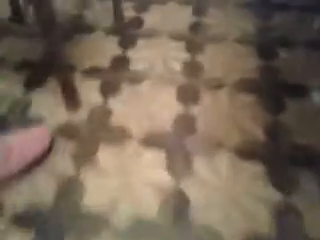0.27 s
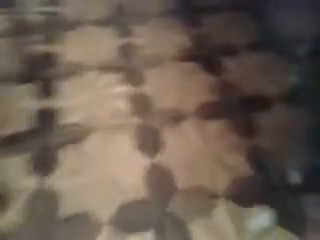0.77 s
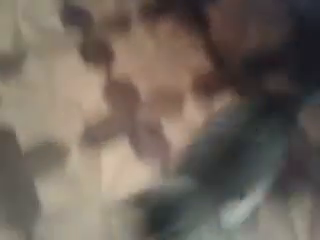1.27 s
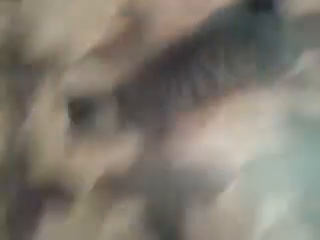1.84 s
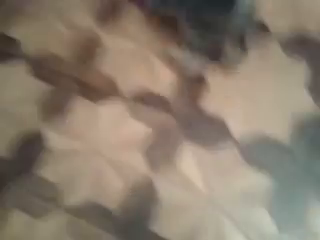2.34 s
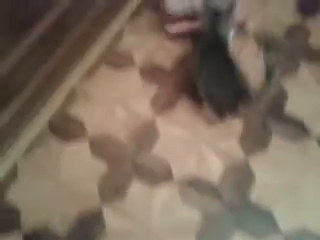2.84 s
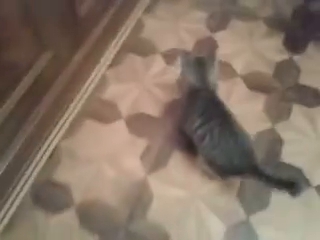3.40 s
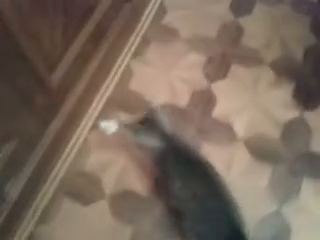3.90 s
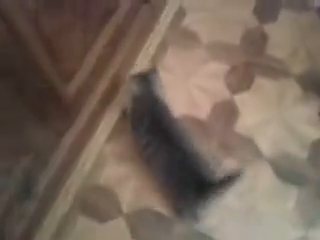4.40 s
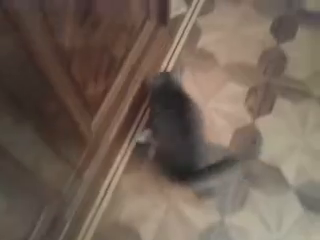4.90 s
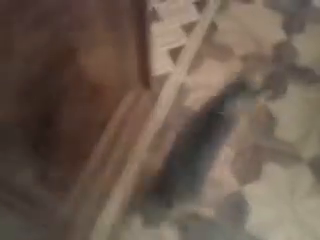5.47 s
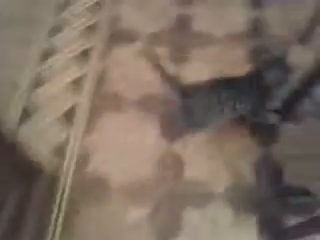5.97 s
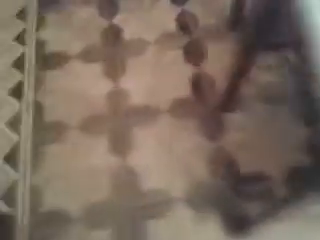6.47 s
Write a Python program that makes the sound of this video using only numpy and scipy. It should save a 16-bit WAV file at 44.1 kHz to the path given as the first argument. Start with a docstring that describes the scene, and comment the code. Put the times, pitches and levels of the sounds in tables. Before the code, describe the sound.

A kitten scuffles after a small ball on echoing tiles, paws pattering and claws clicking, with two hard knocks on a wooden door.

```python
"""In a bare, echoing room with a tiled floor, a kitten chases a small light ball.
Soft paws pat, claws and ball click on the tiles, and slides catch on the floor, scuffing and squeaking.
The kitten's weight makes dull thumps, and heavy blows set the room booming. Twice something knocks
hard on a wooden door, which rattles and rings. A small microphone with little bass and no high treble
picks it all up over a faint hiss."""
import sys
import numpy as np
from scipy import signal
from scipy.fft import rfft, irfft
from scipy.io import wavfile

SR = 44100
rng = np.random.default_rng(int(sys.argv[2]) if len(sys.argv) > 2 else 0)


def file_out(sig):
    """Save sig as 16-bit WAV at sys.argv[1]."""
    # one column per channel
    cols = np.atleast_2d(sig).T
    # limit, then scale
    lim = np.clip(cols, -1, 1)
    pcm = np.round(lim * 32767).astype(np.int16)
    wavfile.write(sys.argv[1], SR, pcm)


N = 297461

# The four pitches in Hz, low to high, at which taps, slides and knocks are given their tone.
BANDS_HZ = (400, 1000, 2300, 5500)


def from_db(db):
    """Turn decibels into a number to multiply by."""
    return 10 ** (np.asarray(db) / 20)


def unit(x):
    """Scale a sound to an energy of one."""
    return x / np.sqrt(np.sum(x ** 2) + 1e-20)


def at_hz(points, hz):
    """Read between rows of (Hz, value), with all octaves equally wide."""
    known_hz, values = np.transpose(points)
    return np.interp(np.log(np.maximum(hz, 1)), np.log(known_hz), values)


def add(out, s, sound):
    """Mix a sound in, starting at s seconds."""
    start = max(round(s * SR), 0)
    out[start:start + len(sound)] += sound[:max(N - start, 0)]


def colour(x, points, size=2048):
    """Shape the tone by rows of (Hz, dB), with a filter that never sounds ahead of its input."""
    gains = from_db(at_hz(points, np.fft.rfftfreq(size, 1 / SR)))
    cepstrum = irfft(np.log(gains))
    cepstrum[1:size // 2] *= 2
    cepstrum[size // 2 + 1:] = 0
    return signal.fftconvolve(x, irfft(np.exp(rfft(cepstrum))))


def tilted(shape_db, db, slope):
    """Levels for the four bands: harder contacts lean to the treble, by slope dB per octave."""
    return np.array(shape_db) + db + slope * np.log2(np.array(BANDS_HZ) / BANDS_HZ[2])


def ring(x, hz, t60):
    """Each click rings at one pitch; t60 is the ring time, the seconds it takes to fade by 60 dB."""
    fade, turn = np.exp(-np.log(1000) / (t60 * SR)), 2 * np.pi * hz / SR
    return signal.lfilter([0, np.sin(turn)], [1, -2 * fade * np.cos(turn), fade * fade], x + 1e-18)


def grains(per_s, spread_db):
    """Tiny contacts at random moments, of uneven size, pushing either way."""
    sizes = from_db(spread_db * np.minimum(rng.exponential(1, N), 4))
    signs = np.sign(rng.random(N) - .5)
    return sizes * signs * (rng.random(N) < per_s / SR)


def stroke(start, end, swell=0.21):
    """The samples a contact covers, and its pressure, which swells and lets go."""
    span = np.arange(max(round(start * SR), 0), min(round(max(end, start + .004) * SR), N))
    return span, np.sin(np.linspace(0, np.pi, len(span) + 2)[1:-1]) ** swell


def flatten(burst, evenness=0.2):
    """Spread a burst's energy a little more evenly from low to high pitch."""
    spectrum = rfft(burst, 2 * len(burst))
    evened = spectrum / (abs(spectrum) + 1e-9) ** evenness
    return unit(irfft(evened)[:len(burst)])


def contacts(rows, first_share, per_s, size=8192):
    """Each row (start, fade time, four band levels) sounds as a sharp touch and a dying chatter."""
    out, t = np.zeros(N), np.arange(size) / SR
    chatter = grains(per_s, spread_db=1.0)
    for s, fade_s, *levels in rows:
        dying = np.roll(chatter, -round(s * SR))[:size] * np.exp(-t / max(fade_s, .0005))
        burst = np.sqrt(1 - first_share) * unit(dying)
        # the first touch crackles for about a millisecond; a long, soft contact has less of it
        touch = unit(rng.standard_normal(size) * t * np.exp(-t / 0.00041))
        burst += np.sqrt(first_share) * np.exp(-abs(fade_s) / .012) * touch
        add(out, s, colour(flatten(burst), list(zip(BANDS_HZ, levels))))
    return out


def hiss():
    """Faint, steady noise lies under everything."""
    # The tone of the hiss. Each row: pitch in Hz, level in dB.
    hiss_tone = [(20, -36), (50, -54), (100, -72.5), (170, -58.5), (300, -49), (600, -47), (1200, -51),
                 (2500, -50.5), (4500, -53), (7000, -48.5)]
    return colour(rng.standard_normal(N + SR), hiss_tone, size=8192)[SR:SR + N]


def dash(grit, stop_s=0.021):
    """Running paws scuffle without a break, then come to a stop."""
    # The opening run. Each row: time in seconds, relative levels in dB of the middle and the treble.
    run_levels = [(0.0, -42.5, -44), (0.29, -48.5, -42), (0.42, -47.5, -53), (0.66, -47.5, -45),
                  (0.79, -46.5, -58), (0.92, -48, -62), (1.11, -47.5, -57), (1.25, -43.5, -47.5),
                  (1.38, -44, -52), (1.54, -46.5, -45.5), (1.69, -46.5, -54), (1.95, -43.5, -42.5),
                  (2.1, -44.5, -34.5), (2.19, -39, -41.5), (2.35, -47, -62), (2.46, -41, -39)]
    # The tones of those two parts. Each row: pitch in Hz, boost or cut in dB.
    middle_tone = [(400, 2), (1000, 0), (2300, 3), (5500, -5.5)]
    treble_tone = [(1000, -18.5), (2300, -1), (5500, 0.5)]
    s, middle_db, treble_db = np.transpose(run_levels)
    t = np.arange(N) / SR
    running = unit(grit) * np.sqrt(N) * np.clip((s[-1] - t) / stop_s, 0, 1)
    middle = colour(running * from_db(np.interp(t, s, middle_db)), middle_tone)
    treble = colour(running * from_db(np.interp(t, s, treble_db)), treble_tone)
    return (middle + treble)[:N]


def scuffs(ping_db=-6, ping_t60=0.011):
    """Running and sliding make tiny catches on the floor's grain; some set a claw or the ball pinging."""
    # Single slides. Each row: start and end in seconds, relative level in dB, tilt in dB per octave.
    skids = [(1.186, 1.278, -38, 2), (1.886, 1.946, -42, -0.5), (2.6, 2.629, -26.5, 3.5),
             (2.632, 2.782, -40, 3), (2.85, 3.02, -46, -1), (3.27, 3.396, -40.5, -1.5),
             (4.296, 4.38, -40.5, 9), (4.388, 4.525, -44.5, -2), (4.971, 5.11, -45.5, 7.5),
             (5.092, 5.166, -35.5, 7.5), (5.994, 6.004, -33.5, 0.5), (6.197, 6.465, -48, 1),
             (6.568, 6.631, -35, 3)]
    # The tone all slides share, in dB for each band.
    skid_tone = (-0.27, -0.85, 0.3, -0.26)
    catches = unit(grains(per_s=2800, spread_db=3.0))
    pings = sum(ring(grains(per_s=25, spread_db=4.5), hz, ping_t60) for hz in np.linspace(1300, 6900, 14))
    grit = catches + from_db(ping_db) * unit(pings)
    out = dash(grit)
    for start, end, db, slope in skids:
        span, pressure = stroke(start, end)
        slide = unit(grit[span]) * np.sqrt(len(span)) * pressure
        add(out, start, colour(slide, list(zip(BANDS_HZ, tilted(skid_tone, db, slope)))))
    return out


def paw_pats(width_octaves=1.5, fall_db_per_octave=13):
    """Rows for contacts(): a padded paw is loudest round one pitch and weaker above and below it."""
    # Each row: start in seconds, relative level in dB, centre pitch in Hz, fade time in seconds.
    pats = [(0.164, -5, 1210, 0.0079), (0.2644, -5, 1470, 0.0066), (0.666, 1, 740, 0.0069),
            (0.784, -5.5, 475, 0.0023), (0.943, -4.5, 1080, 0.0047), (1.291, -5, 824, 0.0052),
            (1.582, -5.5, 2000, .004), (1.65, 0, 300, 0.0054), (1.716, -4.5, 1400, .0025),
            (2.9114, -6, 965, 0.044), (3.0315, 3.5, 1084, 0.0017), (4.1196, -8.5, 1300, 0.017),
            (4.6402, -10.5, 1450, 0.0041), (4.849, -8.5, 440, 0.017), (5.449, -9, 1800, 0.0028),
            (5.6, -8, 1210, .009), (6.32, -9, 1490, 0.0054)]
    rows = []
    for s, db, hz, fade_s in pats:
        octaves_off = np.hypot(np.log2(np.array(BANDS_HZ) / hz), width_octaves) - width_octaves
        rows.append((s, fade_s, *(db - fall_db_per_octave * octaves_off)))
    return rows


def brief_rings(ping_s=0.0036, ping_width_hz=380):
    """Scratches and a hollow paw pat ring briefly round one pitch; sharp touches give short pings."""
    # Each row: start and end in seconds, pitch in Hz, spread of pitch in Hz, level in dB.
    ringing_contacts = [(0.294, 0.371, 3430, 120, -44), (0.301, 0.35, 1820, 200, -49),
                        (1.15, 1.244, 2400, 600, -44), (1.243, 1.296, 680, 350, -50.5),
                        (1.35, 1.4, 4630, 200, -45), (2.604, 2.644, 2540, 79, -30),
                        (2.604, 2.659, 1610, 80, -40), (2.654, 2.76, 2280, 396, -45),
                        (4.308, 4.382, 4650, 900, -43.5), (4.851, 4.886, 763, 199, -53.5),
                        (4.985, 5.04, 5350, 695, -40), (6.014, 6.027, 2210, 700, -32)]
    # Sharp touches of a claw or the ball. Each row: start in seconds, pitch in Hz, level in dB.
    touches = [(1.678, 5700, -32), (2.731, 945, -35.5), (3.032, 930, -32.5), (4.64, 1600, -40),
               (4.701, 4400, -41), (5.477, 3430, -37), (5.566, 4900, -38)]
    out, nudges = np.zeros(N), grains(per_s=2000, spread_db=4.5)
    pings = [(s, s + ping_s, hz, ping_width_hz, db) for s, hz, db in touches]
    for start, end, hz, width, db in ringing_contacts + pings:
        span, pressure = stroke(start, end)
        push = np.pad(nudges[span] * pressure, (0, SR // 20))
        note = ring(push, hz, t60=np.log(1000) / (np.pi * width))
        add(out, start, from_db(db) * np.sqrt(len(span)) * unit(note))
    return out


def tile_ticks():
    """Rows for contacts(): hard claws and the ball click on the tiles."""
    # Each row: start in seconds, relative level in dB, tilt in dB per octave, fade time in seconds.
    clicks = [(0.6218, -11.5, 2.5, 0.0033), (0.758, 0.5, 0.5, 0.0036), (0.797, -9, 0.5, .004),
              (0.874, -7.5, 4, .035), (1.0619, -8.5, 3, 0.0054), (1.089, -7, 5, 0.0042),
              (1.0919, -3.5, 1.5, 0.0017), (1.182, -7.5, 1.5, 0.0038), (1.2285, -5.5, 6, 0.0034),
              (1.3734, -7.5, 2, 0.0035), (1.559, -4, 6.5, .007), (1.68, -13.5, 4, 0.0069),
              (1.94, 0.5, 3.5, 0.006), (2.158, -0.5, -2.5, 0.0033), (2.2874, -1.5, 0, .0036),
              (2.3133, -2.5, 0.5, 0.005), (2.566, -10.5, -1, 0.0078), (2.734, -1, 1.5, 0.0085),
              (3.346, -9, 7, 0.036), (4.206, -15, 0.5, .02), (4.2873, -9.5, 6, 0.002),
              (4.651, -12, 0, 0.0033), (4.7004, -15.5, 0, 0.0018), (5.271, -5, 2, 0.012),
              (5.2917, -12, 7, 0.012), (5.3246, -12, 6.5, .0026), (5.478, -12, 1.5, 0.003),
              (5.5617, -4, 2.5, 0.0048), (5.6591, -6, 3, 0.0024), (6.0089, 1.5, 7.5, 0.0043),
              (6.0213, 0, 5, 0.011), (6.36, -8.5, 0.5, 0.0085), (6.509, -6.5, 0.5, 0.013)]
    # The tone all clicks share, in dB for each band.
    click_tone = (-4.5, -2.5, 0, .5)
    return [(s, fade_s, *tilted(click_tone, db, slope)) for s, db, slope, fade_s in clicks]


def room_boom():
    """Heavy blows, and one faint low bump, leave the room humming at its lowest notes."""
    # The low pushes: a faint bump, then two heavy blows. Each row: time in seconds, strength in dB.
    low_pushes = [(1.289, -67), (3.034, -54.5), (3.656, -41)]
    # The room's notes. Each row: pitch in Hz, relative level in dB, ring time in seconds.
    room_notes = [(46.4, -0.5, 0.8), (60, -10.5, 1.4)]
    pushes = np.zeros(N)
    for s, db in low_pushes:
        add(pushes, s, from_db([db]))
    return sum(from_db(db) * ring(pushes, hz, t60) for hz, db, t60 in room_notes)


def thumps(swell_s=0.0035):
    """The kitten's weight lands softly: one low note swells quickly and dies away."""
    # Each row: start in seconds, pitch in Hz, ring time in seconds, level in dB.
    landings = [(1.647, 300, 0.13, -46), (3.04, 336, 0.098, -39), (3.434, 243, 0.17, -34),
                (3.685, 240, 0.071, -31)]
    out, t = np.zeros(N), np.arange(SR // 2) / SR
    for s, hz, t60, db in landings:
        loudness = np.tanh(t / swell_s) ** 2 * np.exp(-np.log(1000) * t / t60)
        add(out, s, from_db(db) * np.sin(2 * np.pi * hz * t) * loudness)
    return out


def knock_stages():
    """Rows for contacts(): each knock is a bright touch, a full hit, a rattle and one bounce."""
    # Each row: start in seconds, relative levels in dB of touch, hit and rattle, the rattle's fade time
    # in seconds, bass change in dB, delay of the bounce in seconds.
    knocks = [(3.410, 15, 18, 10, 0.13, -14.5, 0.018), (3.660, 12.5, 22.5, 22, 0.024, 0, .038)]
    # The tone of each stage, in dB for each band.
    touch_tone = (-2, -5, 1, 4)
    hit_tone = (-10.5, 3.5, -9, -15)
    rattle_tone = (-2.2, -1.8, -0.38, -2)
    bounce_tone = (0.5, -12.5, 6.5, -18)
    hit_delay_s, rattle_delay_s, bounce_loss_db = 0.009, 0.0096, 6
    touch_fade_s, hit_fade_s, bounce_fade_s = 0.015, 0.0064, 0.0021
    rows = []
    for s, touch_db, hit_db, rattle_db, rattle_fade_s, bass_db, bounce_delay_s in knocks:
        bass = np.array([bass_db, 0, 0, 0])
        rows += [(s, touch_fade_s, *(np.array(touch_tone) + touch_db)),
                 (s + hit_delay_s, hit_fade_s, *(bass + hit_tone + hit_db)),
                 (s + rattle_delay_s, rattle_fade_s, *(bass + rattle_tone + rattle_db)),
                 (s + bounce_delay_s, bounce_fade_s, *(bass + bounce_tone + hit_db - bounce_loss_db))]
    return rows


def door_knocks(lowest_hz=330):
    """Blows clatter on the wooden door, which gives off little bass and rings at its own notes."""
    # The door's notes. Each row: pitch in Hz, relative level in dB, ring time in seconds.
    door_notes = [(384, -58, 0.18), (500, -56, .1), (985, -68, .25), (1140, -54.5, 0.19),
                  (1530, -50.5, 0.22), (1674, -55, 0.24), (1880, -58, 0.0066), (2000, -59, 0.37),
                  (2830, -44.5, 0.11), (2950, -47.5, 0.24), (6600, -59.5, .14)]
    blows = contacts(knock_stages(), first_share=0.062, per_s=14000)
    blows = signal.sosfilt(signal.butter(3, lowest_hz, "high", fs=SR, output="sos"), blows)
    # a panel's sound follows its speed, so take the slope of each note's swing
    rings = sum(from_db(db) * np.gradient(ring(blows, hz, t60)) * SR / (2 * np.pi * hz)
                for hz, db, t60 in door_notes)
    return blows + rings


def room_tail(first_echo_s=0.0037, thicken_s=0.027, bands=6):
    """Off hard walls, a few separate echoes thicken into a tail that dies band by band."""
    # How long the room echoes. Each row: pitch in Hz, seconds to fade by 60 dB.
    echo_times = [(200, 0.86), (700, 0.62), (2000, 0.57), (4000, 0.66), (7000, 0.5)]
    t = np.arange(SR) / SR
    density = np.clip(.06 + (t / thicken_s) ** 2 / 2, 0, 1)
    echoes = rng.standard_normal(SR) * (rng.random(SR) < density) / np.sqrt(density)
    spectrum, hz = rfft(echoes * (t > first_echo_s)), np.fft.rfftfreq(SR, 1 / SR)
    centres, tail = np.geomspace(200, 7000, bands), 0
    for centre, only_this_band in zip(centres, np.eye(bands)):
        band = irfft(spectrum * at_hz(list(zip(centres, only_this_band)), hz), SR)
        tail = tail + band * np.exp(-np.log(1000) * t / at_hz(echo_times, centre))
    return unit(tail)


def room_echo(x, step_s=.009, spots=7):
    """Contacts fall on changing spots, so the sound fades from one pattern of echoes to the next."""
    position, out = np.arange(N) / (SR * step_s), 0
    for spot in range(spots):
        nearness = np.sin(np.pi / 2 * np.minimum((position - spot) % spots, 2))
        out = out + signal.fftconvolve(x * nearness, room_tail())[:N]
    return out


def scene():
    """Taps, knocks and slides sound directly and as echoes, joined by thumps, booms and hiss."""
    # The tone that taps, knocks, slides and echoes share. Each row: pitch in Hz, boost or cut in dB.
    shared_tone = [(50, -33), (130, -29.5), (210, -12), (320, -8.5), (450, -3.5), (700, 1.5), (1200, 0),
                   (1800, 2), (2700, -3), (3800, -3), (5000, -2.5), (6700, 0), (8000, 19.5)]
    taps = from_db(2.5) * contacts(tile_ticks() + paw_pats(), first_share=0.21, per_s=9000)
    knocks = from_db(-2.6) * door_knocks()
    scuffs_and_rings = from_db(-1.5) * scuffs() + brief_rings()
    echo = room_echo(from_db(-0.55) * taps + from_db(1.5) * knocks + from_db(0.86) * scuffs_and_rings)
    play = colour(taps + knocks + scuffs_and_rings + echo, shared_tone)[:N]
    return (play + thumps() + room_boom() + hiss())[None]


def record(dry):
    """The small microphone cuts off the high treble steeply."""
    cutoff_hz = 6880
    return signal.sosfilt(signal.cheby1(12, .5, cutoff_hz, fs=SR, output="sos"), dry)


dry = scene()
out = record(dry)
file_out(out)
```